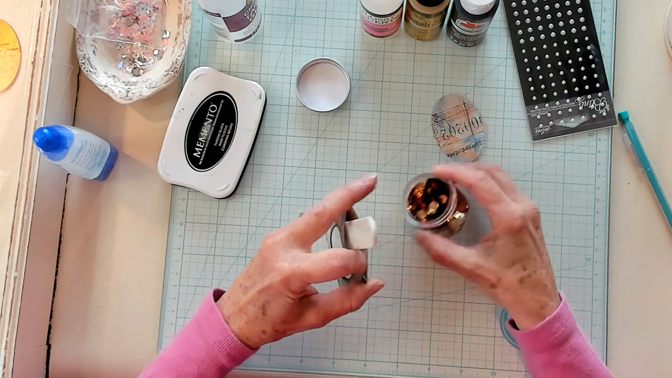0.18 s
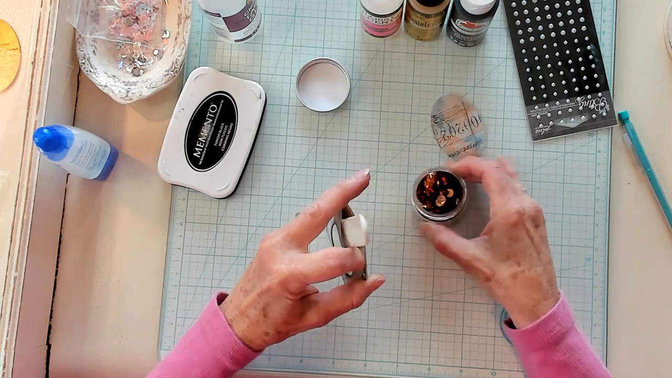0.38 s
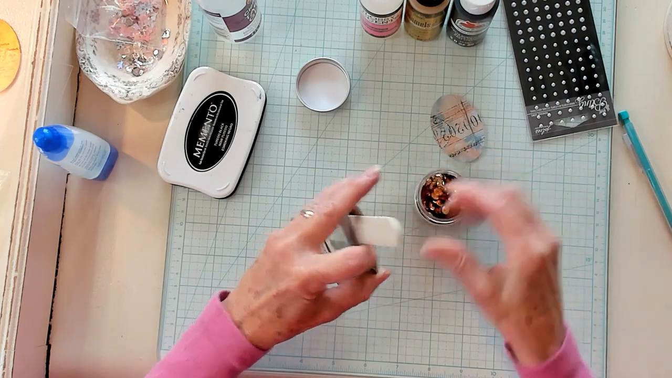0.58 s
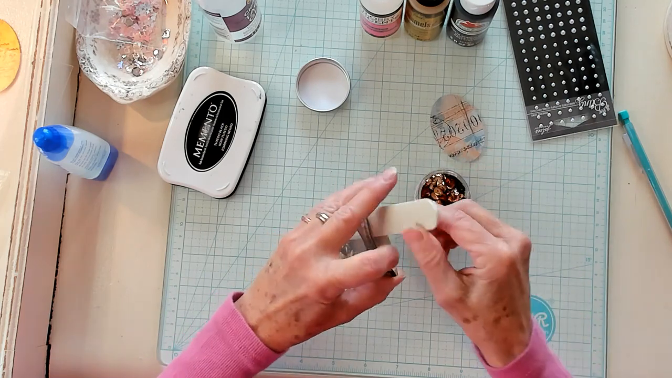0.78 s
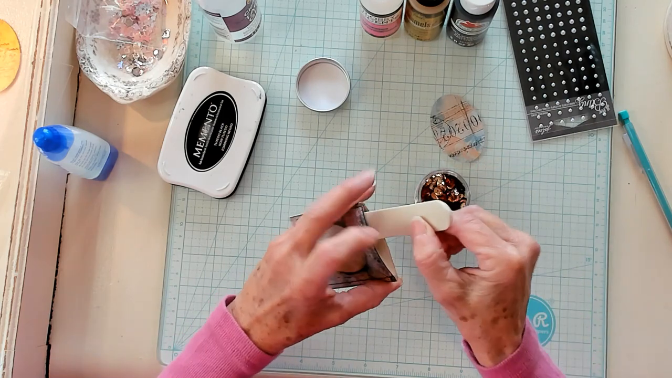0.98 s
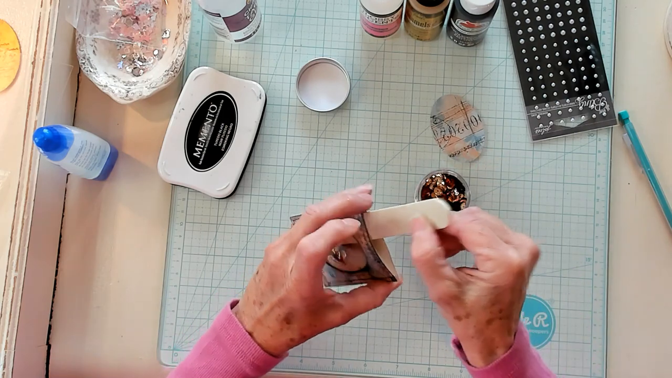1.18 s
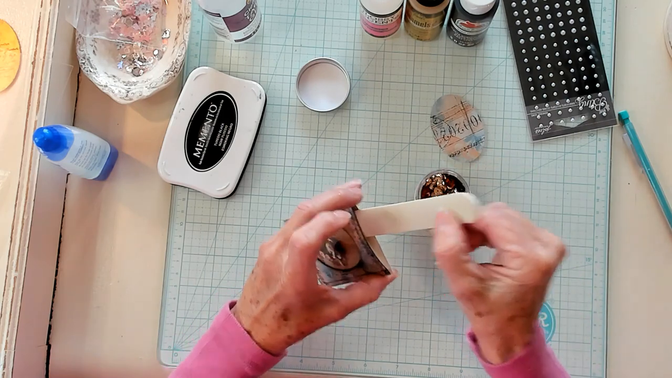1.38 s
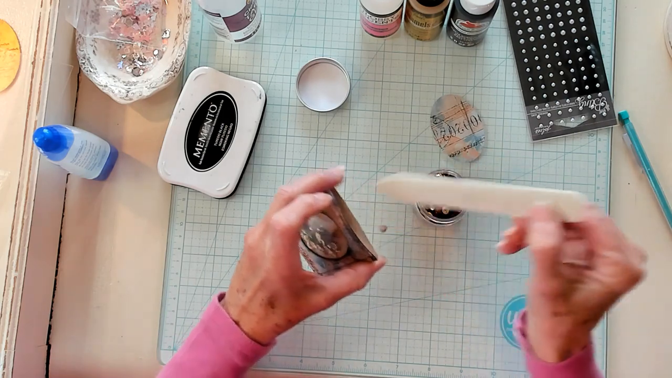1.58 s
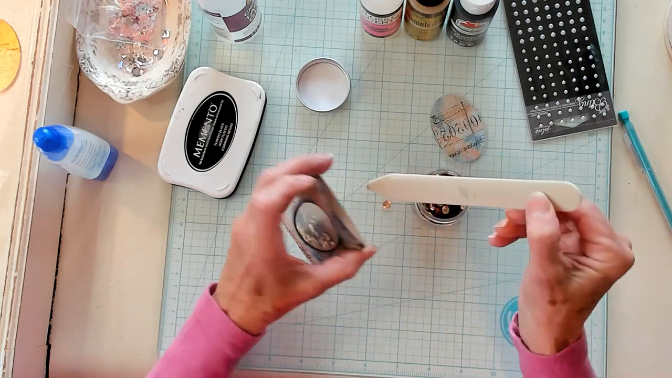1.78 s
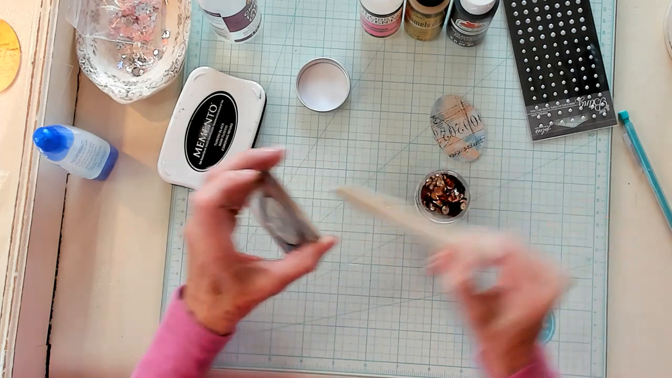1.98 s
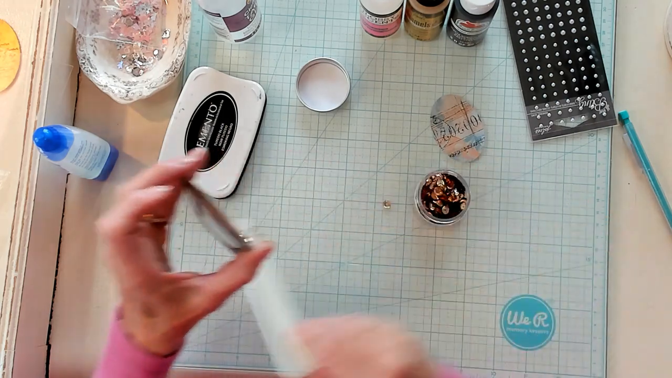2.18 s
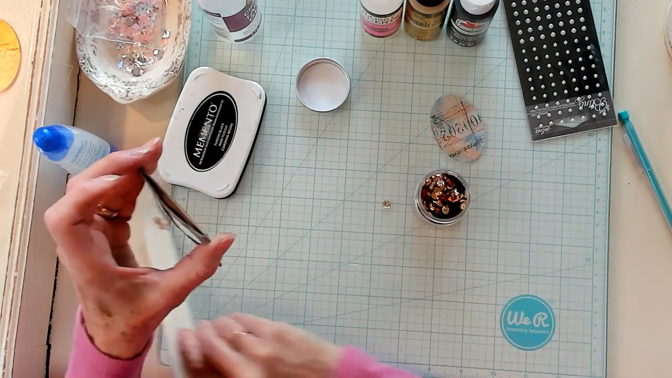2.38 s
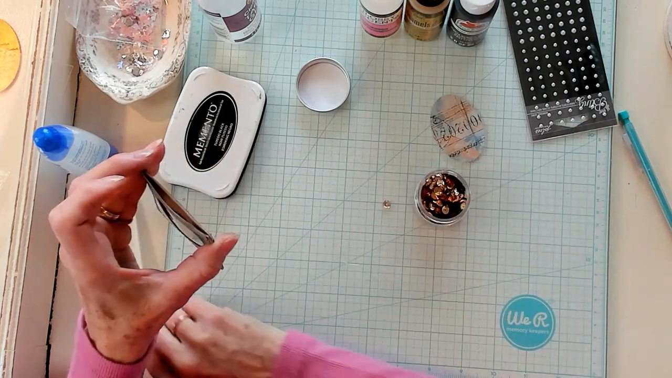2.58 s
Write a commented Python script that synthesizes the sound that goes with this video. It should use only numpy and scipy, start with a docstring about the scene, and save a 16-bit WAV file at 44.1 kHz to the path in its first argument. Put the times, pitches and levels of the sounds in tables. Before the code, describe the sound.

Two knocks ring briefly as a small jar lands on a table and its sequins settle. Light clicks and a papery scrape follow, then a plastic tool clatters onto the table, over a faint hum in a small room.

```python
"""A faint brush along a rim, then two knocks: a small jar of sequins is set down on a craft table.
Jar and table ring briefly, and the sequins settle with tiny clicks. A plastic folding tool clicks
as it is picked up, then rasps into a paper pocket of sequins and out again, catching and slipping.
Last, it clatters onto the table and slides. The room is small and fairly dry, with a faint hum."""
import sys
import numpy as np
from scipy import signal
from scipy.fft import rfft, irfft
from scipy.io import wavfile

SR = 44100
rng = np.random.default_rng(int(sys.argv[2]) if len(sys.argv) > 2 else 0)


def unload_wav(signal):
    """Save mono or channel-first audio to the path in sys.argv[1] as 16-bit WAV at rate SR, clipped to [-1, 1]."""
    wavfile.write(
        sys.argv[1],
        SR,
        np.round(np.clip(np.atleast_2d(signal).T, -1, 1) * 32767).astype(np.int16),
    )


N = 114660  # 2.6 seconds


def from_db(db):
    """Turn decibels into a gain to multiply by."""
    return 10 ** (np.asarray(db) / 20)


def normalize(x):
    """Scale to an average (rms) level of 1."""
    return x / np.sqrt(np.mean(x ** 2) + 1e-24)


def fade(fade_s):
    """Die away by 60 dB in fade_s seconds."""
    return np.exp(-np.log(1000) * np.minimum(np.arange(N) / SR / fade_s, 10))


def start_at(x, start_s):
    """Put silence before a sound."""
    return np.concatenate([np.zeros(int(start_s * SR)), x])[:N]


def loudness(points):
    """A gain that follows (time_s, level_db) points and is silent outside them."""
    time_s, level_db = np.array(points).T
    return from_db(np.interp(np.arange(N) / SR, time_s, level_db, left=-140, right=-140))


def shape_tone(x, points, tilt_db=0, size=2048):
    """Balance lows and highs by (pitch_hz, relative_db) points; add tilt_db per octave above 1 kHz."""
    pitch_hz, relative_db = np.array(points, float).T
    octave = np.log2(np.maximum(np.arange(size // 2 + 1) * SR / size, 1))
    gain = from_db(np.interp(octave, np.log2(pitch_hz), relative_db) + tilt_db * np.maximum(octave - 10, 0))
    # Build the filter so that it never sounds ahead of its input.
    cepstrum = irfft(np.log(gain))
    cepstrum[1:size // 2] *= 2
    cepstrum[size // 2 + 1:] = 0
    response = irfft(np.exp(rfft(cepstrum)))
    return signal.oaconvolve(x, response / np.linalg.norm(response))[:N]


def resonate(x, pitch_hz, width_hz):
    """Keep a band around one pitch, scaled to level 1."""
    peak = signal.iirpeak(pitch_hz, pitch_hz / width_hz, fs=SR)
    return normalize(signal.lfilter(*peak, signal.lfilter(*peak, x)))


def ring(notes, rise_s=.0008, tilt_db=0):
    """A struck object rings with its own notes: sine waves that swell quickly and fade."""
    t = np.arange(N // 4) / SR
    out = 0
    for pitch_hz, level_db, fade_s in notes:
        gain = from_db(level_db + tilt_db * max(np.log2(pitch_hz) - 10, 0))
        wave = np.sin(2 * np.pi * (pitch_hz * t + rng.random()))
        out += gain * wave * np.exp(-np.log(1000) * t / fade_s)
    out *= 1 - np.exp(-(t / rise_s) ** 2)
    bass_cut = signal.butter(4, 230, "high", fs=SR, output="sos")  # the ringing carries little bass below 230 Hz
    return np.pad(signal.sosfilt(bass_cut, out), (0, N - len(t)))


def friction(ticks_per_s=1900, spread_db=.5):
    """Rubbing surfaces catch and slip, making a stream of tiny ticks."""
    ticks = (rng.random(N) < ticks_per_s / SR) * rng.choice([-1, 1], N)
    sizes = from_db(-spread_db * np.clip(rng.standard_normal(N), -2, 2))
    return normalize(ticks * sizes)


def room(x, echo_db=-1.5, rise_s=.0044):
    """Nearby walls add a short blur of echoes."""
    echoes = rng.standard_normal(N) * fade(.17) * (1 - np.exp(-np.arange(N) / SR / rise_s))
    return x + from_db(echo_db) * signal.fftconvolve(x, echoes / np.linalg.norm(echoes))[:N]


# Tone of the room's air: pitch_hz, relative_db
AIR_TONE = [(15, -76), (25, -42.5), (110, -21), (144, -2.5), (164, -9), (289, -6.5), (313, -14.5),
            (469, -11), (523, -15), (648, -13), (1340, -16), (1800, -18), (3720, -23), (15500, -37)]
# Notes of the hum: pitch_hz, level_db
HUM_NOTES = [(140, -79), (179, -81.5), (234, -80)]

def air_and_hum(air_db=-69.5):
    """Soft room air, and narrow bands of noise that make a wavering hum."""
    hum = sum(from_db(level_db) * resonate(rng.standard_normal(N), pitch_hz, width_hz=12)
              for pitch_hz, level_db in HUM_NOTES)
    air = normalize(shape_tone(rng.standard_normal(N), AIR_TONE, size=8192))
    return hum + from_db(air_db) * air


# Soft bumps on the table: start_s, level_db
HAND_BUMPS = [(0.535, -64.5), (0.602, -63.5), (0.689, -62)]

def hand_bumps():
    """The hand bumps the table as it leaves the jar and reaches for the tool."""
    out = 0
    for start_s, level_db in HAND_BUMPS:
        thud = resonate(rng.standard_normal(N), pitch_hz=262, width_hz=157)
        out += start_at(from_db(level_db) * fade(.37) * thud, start_s)
    return out


# Loudness of the brushing: time_s, level_db
RIM_LEVELS = [(0, -88), (0.02, -60), (0.046, -47.5), (0.065, -58), (0.09, -64), (0.13, -80)]
# Tone of the brushing: pitch_hz, relative_db
RIM_TONE = [(350, -54), (600, -16), (899, -17.5), (1060, -35), (1290, -0.5), (1690, -8), (2710, -23),
            (3410, -10.5), (6510, -7), (15000, -19.5)]

def rim_brush():
    """The tool brushes the jar's rim, which answers with a hollow note."""
    hollow = resonate(friction(), pitch_hz=1577, width_hz=400)
    rub = shape_tone(friction(), RIM_TONE)
    return loudness(RIM_LEVELS) * (rub + from_db(-1) * hollow) / 2


# Loudness of the rubbing: time_s, level_db
RUB_LEVELS = [(1.06, -72.5), (1.09, -57.5), (1.105, -39.5), (1.15, -45.5), (1.166, -44), (1.18, -42.5),
              (1.25, -47), (1.29, -58.5), (1.37, -53), (1.42, -66), (1.465, -59), (1.48, -55.5),
              (1.52, -42), (1.555, -64), (1.58, -66.5), (1.7, -69.5)]
# Tone of the rubbing: pitch_hz, relative_db
RUB_TONE = [(18, -41), (30, -15), (156, -16.5), (369, -13), (747, -27), (808, -16.5), (1440, -15.5),
            (2180, -4.5), (2550, -4), (3230, -8), (3780, 2), (4420, -1), (6210, -0.5), (6720, -5),
            (10200, -11), (15500, -19)]
# Where the pocket rings: pitch_hz, width_hz, relative_db
POCKET_NOTES = [(1380, 200, -17), (1950, 500, -11), (2240, 50, -8), (3750, 700, 1), (4550, 600, -5),
                (5280, 70, -4), (6050, 1000, -3), (6950, 250, -8), (7560, 350, -7)]
# Loudness of the rasp as the tool wedges: time_s, level_db
WEDGE_LEVELS = [(1.11, -51), (1.15, -40), (1.166, -29), (1.18, -84), (1.22, -71)]

def pocket_scrape(ring_db=-21):
    """The tool rubs paper and sequins; the pocket rings along, most where the tool wedges."""
    rub = friction()
    rub_gain = loudness(RUB_LEVELS)
    scrape = shape_tone(rub * rub_gain, RUB_TONE) / np.sqrt(2)
    pocket = normalize(sum(from_db(relative_db) * resonate(rub, pitch_hz, width_hz)
                           for pitch_hz, width_hz, relative_db in POCKET_NOTES))
    return scrape + pocket * (loudness(WEDGE_LEVELS) + from_db(ring_db) * rub_gain)


# Each light touch: start_s, level_db, pitch_hz, ring_over_snap_db
TOUCHES = [(0.1454, -52.5, 8400, 2.5), (0.448, -38.5, 10470, 8.5), (0.4638, -47.5, 10780, -7),
           (0.6241, -40, 6400, -1), (0.672, -37, 6250, -1.5), (0.6842, -30, 6940, -6.5),
           (0.7638, -48.5, 1920, 1), (0.8472, -24, 1890, 4.5), (0.8657, -27.5, 3680, 1.5),
           (0.88, -38.5, 5100, 16), (0.9579, -43, 3100, 8), (0.9781, -33.5, 7000, -12),
           (1.1013, -37.5, 1897, 2), (1.1275, -33, 3600, -8), (1.2194, -34.5, 4970, -2),
           (1.2339, -36.5, 4800, 3.5), (1.2561, -37, 6140, 3), (1.2977, -45, 5005, 1),
           (1.3978, -44.5, 5070, 4), (1.4731, -41, 3530, 1.5), (1.501, -40.5, 6400, 5),
           (1.5142, -37.5, 6500, -14), (1.5205, -44, 3670, 7), (1.5375, -50, 5047, -13),
           (1.5470, -38, 6200, -15), (1.583, -46.5, 6060, -16), (2.0128, -44.5, 4370, -20)]
# Tone of the snap: pitch_hz, relative_db
SNAP_TONE = [(18, -15), (30, -22), (249, -15), (921, -22), (1640, -10), (2300, -6.5), (2760, -6),
             (3680, -3), (4190, -8), (5890, -5.5), (7460, -4), (8950, -12.5), (15500, -21.5)]

def light_clicks(hold_s=.0012, fade_s=.0091, rise_s=.00064, size=13000):
    """Tool, nails and sequins touch: each gives a snap, a short ring and a faint room tail."""
    t = np.arange(size) / SR
    contact = np.exp(-np.log(1000) * np.clip((t - hold_s) / fade_s, 0, 10))
    tail = from_db(-13.5) * fade(.22)[:size]
    envelope = (contact + tail) * (1 - np.exp(-t / rise_s))
    envelope_level = np.sqrt(np.mean(envelope ** 2))
    out = 0
    for start_s, level_db, pitch_hz, ring_over_snap_db in TOUCHES:
        noise = rng.standard_normal((2, size))
        tilt_db = np.log2(pitch_hz / 4170)  # smaller contacts ring higher and snap brighter
        snap = normalize(envelope * shape_tone(noise[0], SNAP_TONE, tilt_db)[:size])
        note = normalize(envelope * resonate(noise[1], pitch_hz, width_hz=.33 * pitch_hz))
        click = from_db(level_db) * envelope_level * normalize(snap + from_db(ring_over_snap_db) * note)
        out += start_at(np.pad(click, (0, N)), start_s)
    return out


# The table's own notes: pitch_hz, level_db, fade_s
TABLE_NOTES = [(517, -1, .19), (544, -1, .18), (567, 0, .19), (592, -2, .18), (621, 0, .19), (690, -4, .16),
               (1195, -10, .17)]

def table_boom():
    """The tabletop booms when something lands on it."""
    return ring(TABLE_NOTES, rise_s=.0013)


# Each hit of the tool on the table: start_s, ring_db, clatter_db, boom_db
TOOL_HITS = [(2.2411, -47.5, -41, -38), (2.2891, -27, -27.5, -46), (2.2972, -42, -29, -51),
             (2.3057, -39, -29, -48), (2.323, -46.5, -42, -42), (2.5350, -67, -47, -58.5)]
# The tool's own notes: pitch_hz, level_db, fade_s
TOOL_NOTES = [(1765, -4, .17), (2008, -5, .17), (2046, -4, .22), (2215, -7, .18), (2437, -8, .2),
              (2544, -8, .18), (2777, 2, .2), (2881, 1, .21), (3030, -1, .18), (3087, -5, .17),
              (3687, -7, .18), (4404, -12, .2), (4807, -12, .16), (6153, -5, .08)]
# Tone of the clatter: pitch_hz, relative_db
CLATTER_TONE = [(47, -43), (80, -21.5), (225, -17), (294, -23.5), (621, -4.5), (809, -17.5), (986, -8.5),
                (1230, -14.5), (1750, -3.5), (2600, -8), (2840, -2), (4130, -12), (6280, -19), (15500, -36)]
# Loudness of the slide: time_s, level_db
SLIDE_LEVELS = [(2.36, -57), (2.42, -50.5), (2.46, -57.5), (2.51, -55.5), (2.56, -61.5), (2.6, -80)]
# Tone of the slide: pitch_hz, relative_db
SLIDE_TONE = [(120, -50), (200, -22), (235, -14), (271, -20), (407, -19), (613, 2.5), (875, -19.5),
              (1180, 3.5), (1570, -16.5), (2050, -7), (3200, -13.5), (6070, -29), (14000, -40)]

def tool_clatter():
    """The tool touches down, slaps flat, bounces and slides on the table's mat."""
    out = 0
    for start_s, ring_db, clatter_db, boom_db in TOOL_HITS:
        ringing = from_db(ring_db) * ring(TOOL_NOTES) + from_db(boom_db) * table_boom()
        envelope = from_db(-5.5) * fade(.0061) + fade(.2)  # a sharp crack and a longer tail
        clatter = shape_tone(rng.standard_normal(N) * envelope, CLATTER_TONE)
        out += start_at(ringing + from_db(clatter_db) * clatter, start_s)
    return out + loudness(SLIDE_LEVELS) * shape_tone(friction(), SLIDE_TONE)


# Each knock of the jar: start_s, ring_db, boom_db, thud_db, tilt_db (per octave), crack_db
JAR_HITS = [(0.2357, -17.5, -25, -24, -1, -35.5), (0.3630, -13.5, -25, -22, 2, -25.5)]
# Notes of the jar on the table: pitch_hz, level_db, fade_s
JAR_NOTES = [(330, -17, .19), (463, -16, .15), (698, -7, .14), (788, -12, .14), (914, 1.5, .15),
             (961, -12, .13), (996, -9, .14), (1052, -13, .15), (1147, -10, .14), (1232, -10, .14),
             (1562, -19, .14), (1895, -20, .14), (2330, -22, .14), (2842, -24, .18), (3262, -28, .17),
             (3903, -32, .16)]
# Tone of the thud: pitch_hz, relative_db
THUD_TONE = [(60, -38), (130, -23), (220, -15), (300, -13.5), (390, -17), (560, -7.5), (900, -1),
             (1250, -6.5), (1600, -9.5), (2400, -17), (3200, -22), (4200, -24.5), (5400, -34), (6300, -31),
             (8300, -36), (10800, -37), (12500, -43), (15500, -49.5)]

def jar_knocks():
    """The jar meets the table with one edge, then drops flat; the harder knock is brighter."""
    out = 0
    for start_s, ring_db, boom_db, thud_db, tilt_db, crack_db in JAR_HITS:
        noise = rng.standard_normal((2, N))
        crack = from_db(crack_db) * fade(.035) * resonate(noise[0], pitch_hz=2800, width_hz=2200)
        thud = from_db(thud_db) * shape_tone(noise[1] * fade(.23), THUD_TONE, tilt_db)
        ringing = from_db(ring_db) * ring(JAR_NOTES, tilt_db=tilt_db)
        boom = from_db(boom_db) * table_boom()
        out += start_at(crack + thud + ringing + boom, start_s)
    return out


def scene():
    """Add all the sounds into one channel; the rubbing goes through the room's echoes."""
    hits = jar_knocks() + tool_clatter() + light_clicks() + hand_bumps()
    rubbing = room(pocket_scrape() + rim_brush())
    return (hits + rubbing + air_and_hum())[None]


def record(dry):
    """Cut the very highest treble."""
    top_hz = 15900
    return signal.sosfilt(signal.ellip(10, .2, 70, top_hz, fs=SR, output="sos"), dry)


dry = scene()
out = record(dry)
unload_wav(out)
```